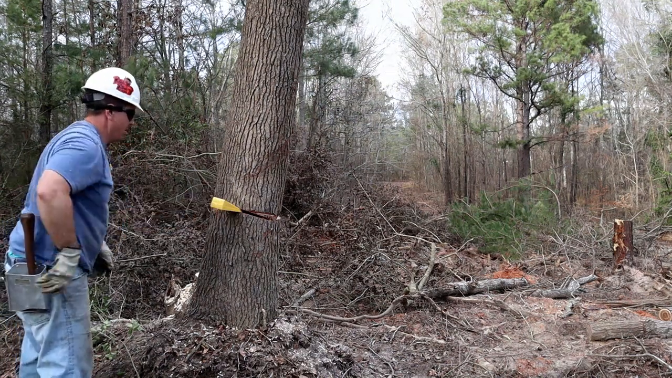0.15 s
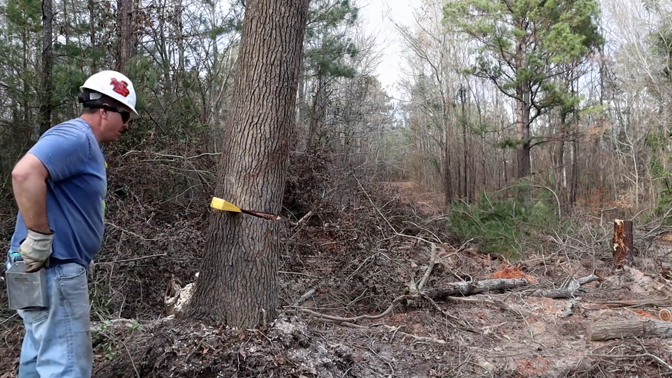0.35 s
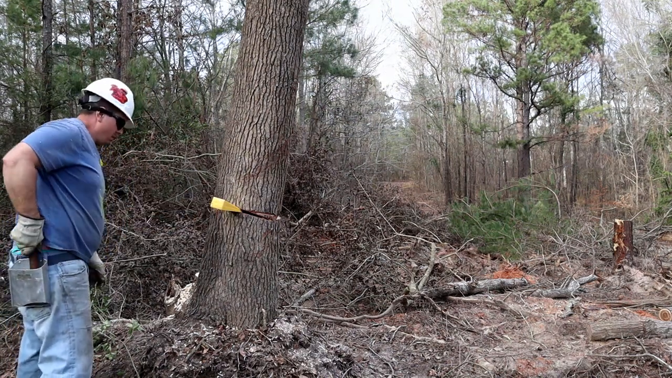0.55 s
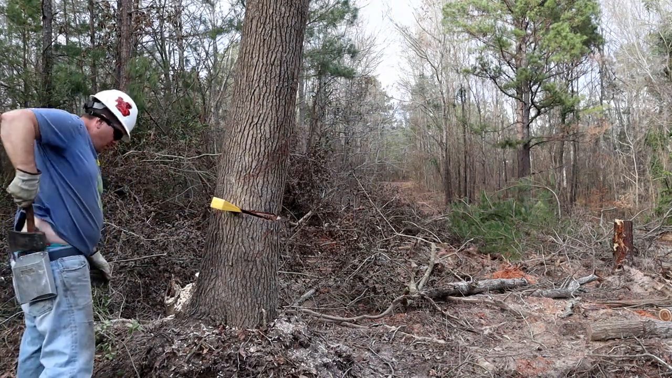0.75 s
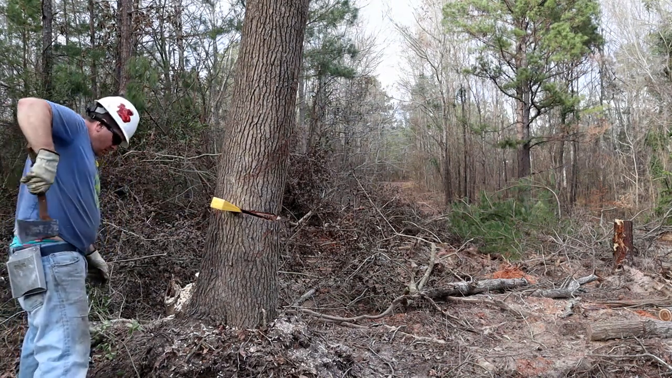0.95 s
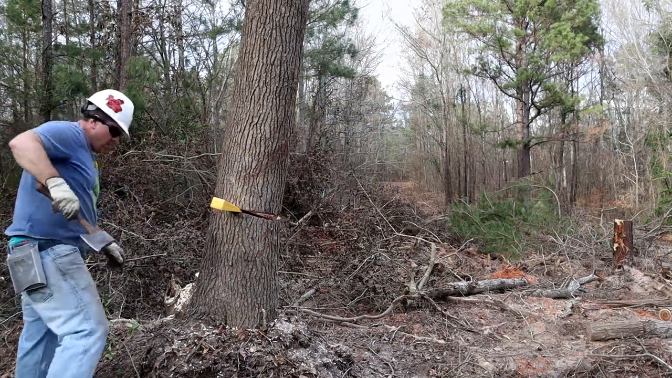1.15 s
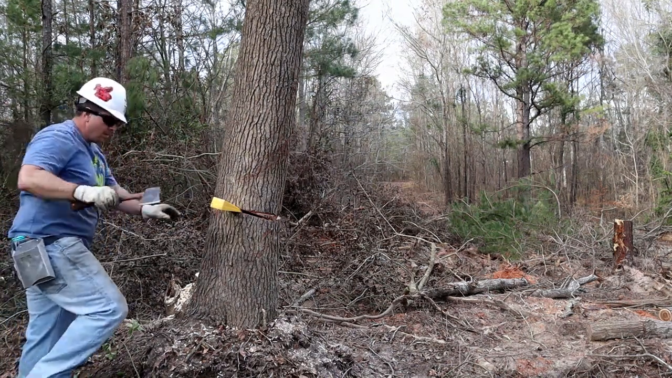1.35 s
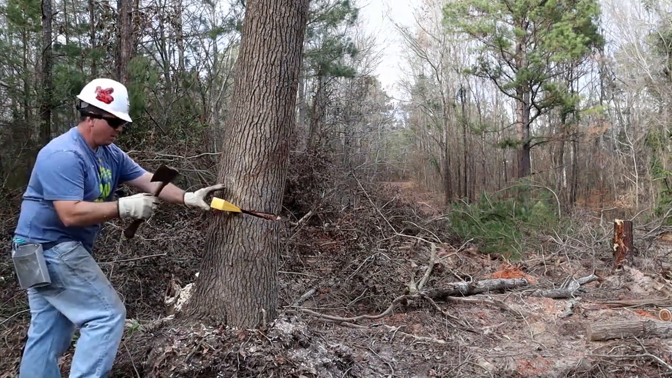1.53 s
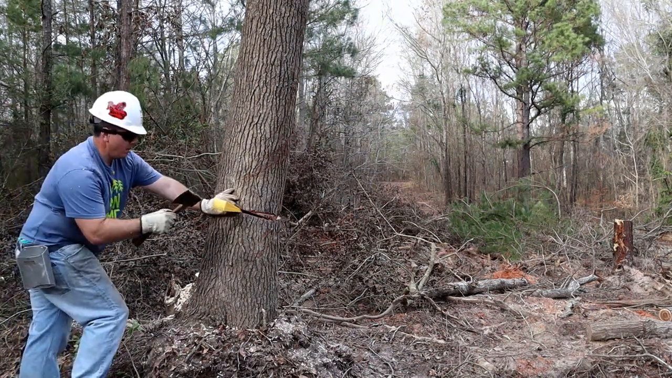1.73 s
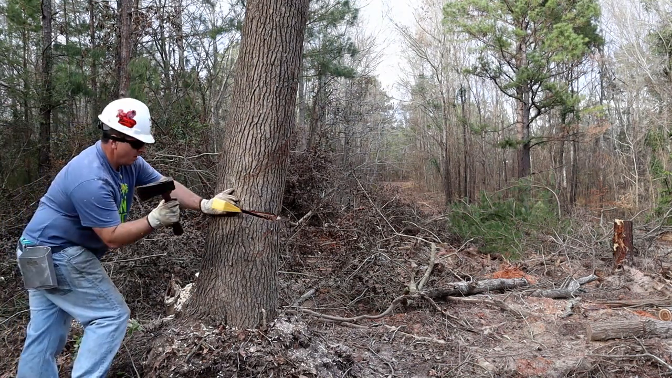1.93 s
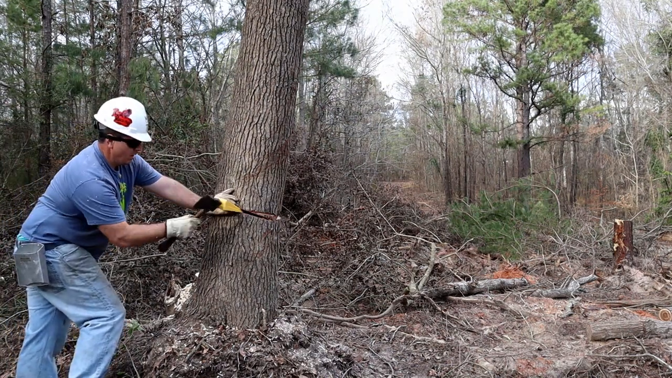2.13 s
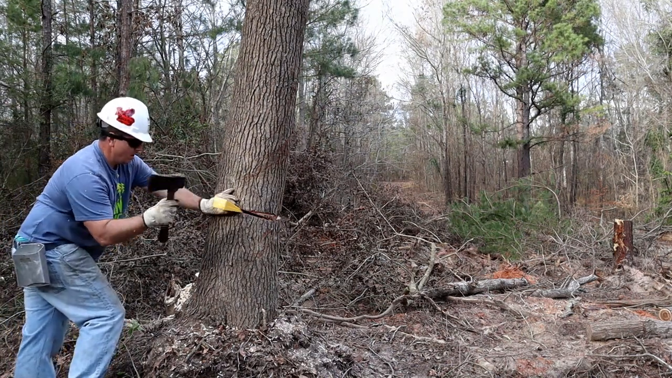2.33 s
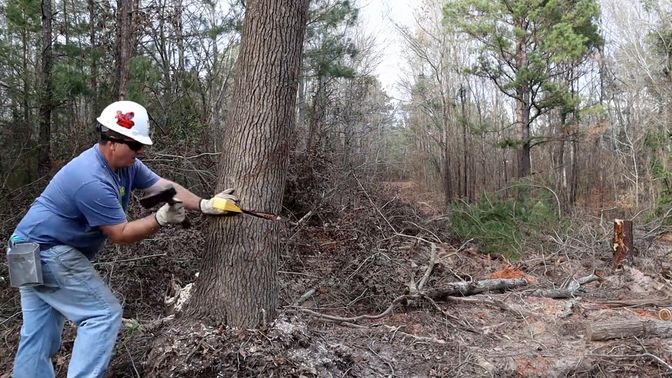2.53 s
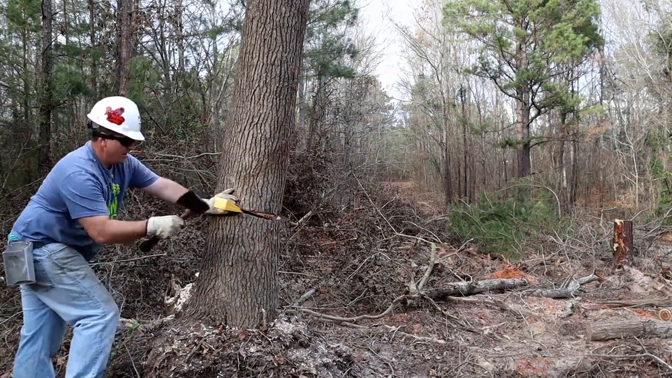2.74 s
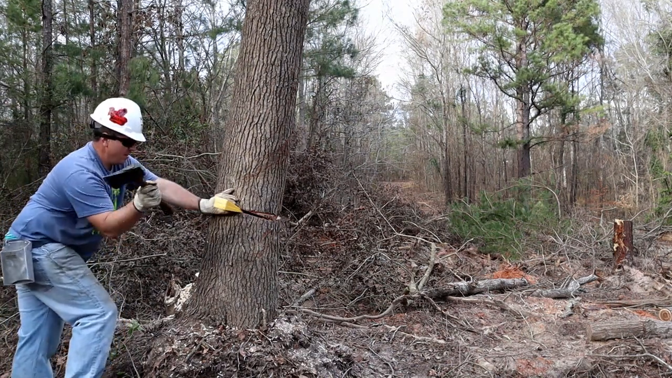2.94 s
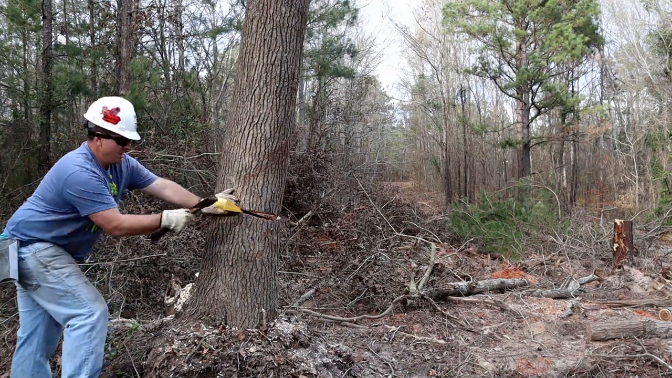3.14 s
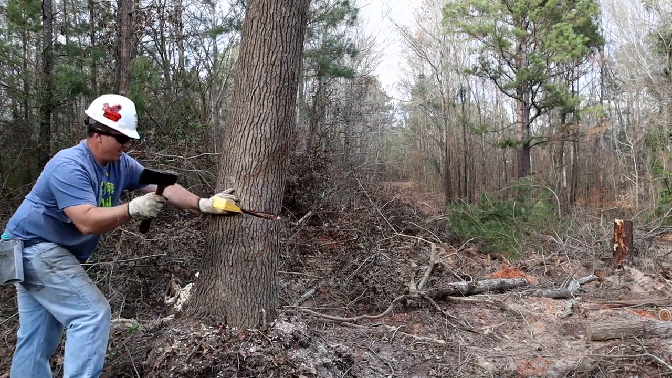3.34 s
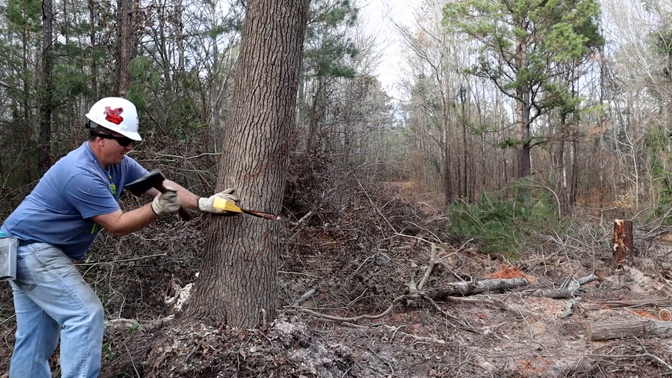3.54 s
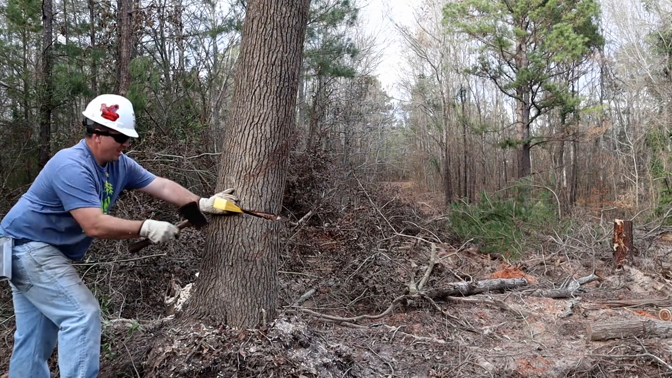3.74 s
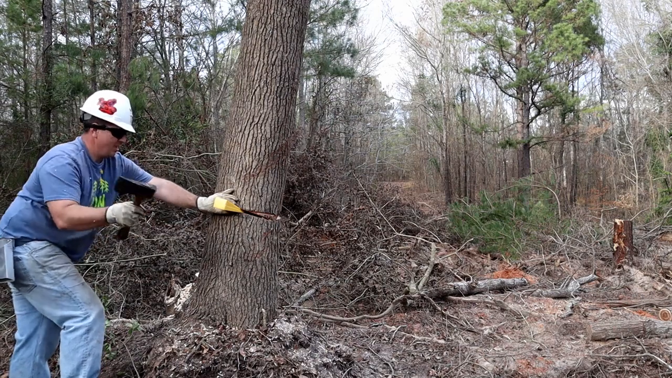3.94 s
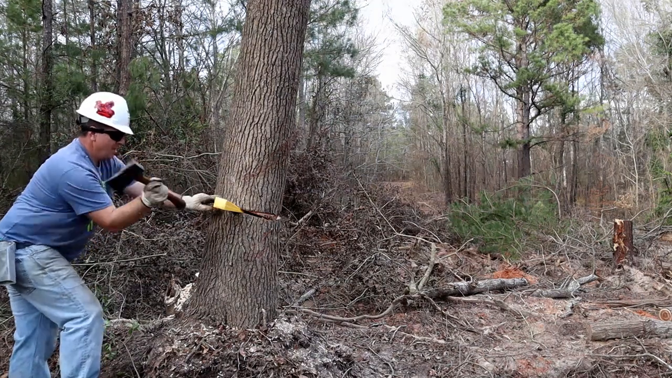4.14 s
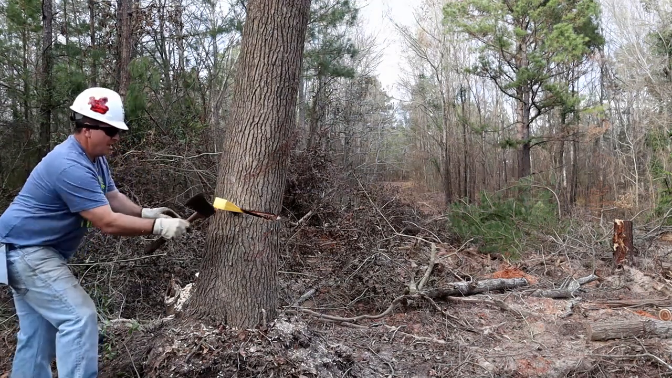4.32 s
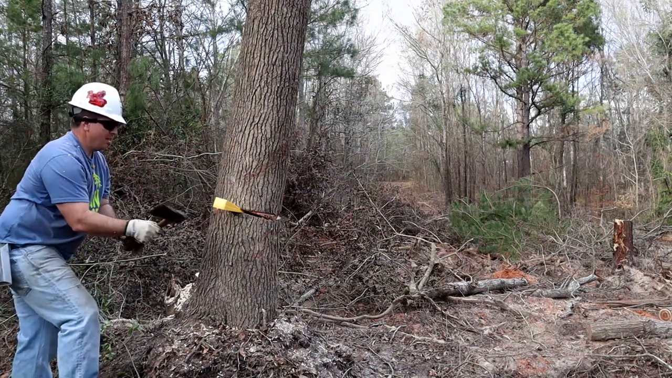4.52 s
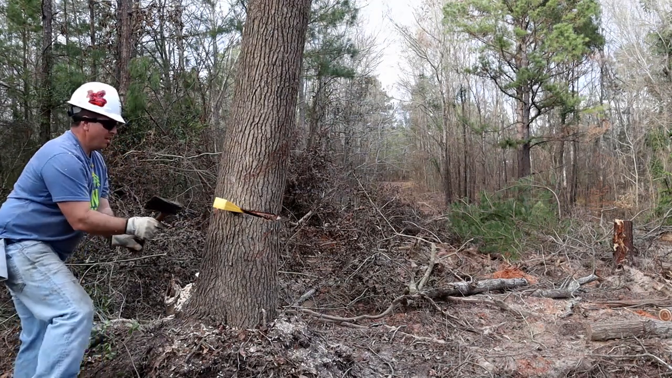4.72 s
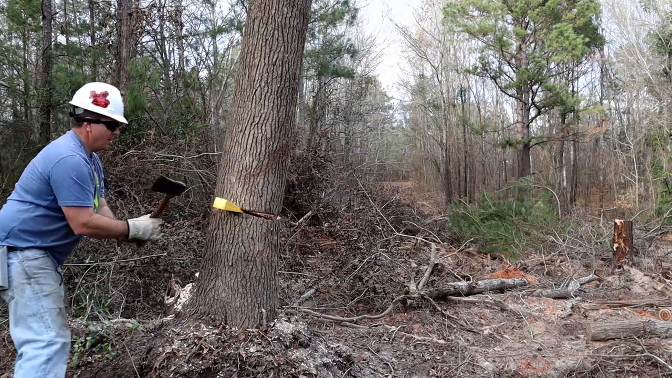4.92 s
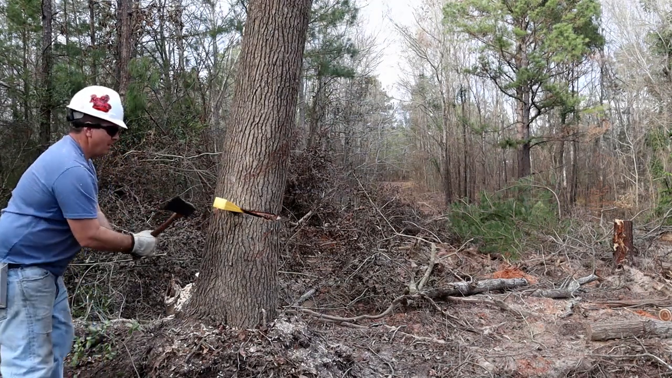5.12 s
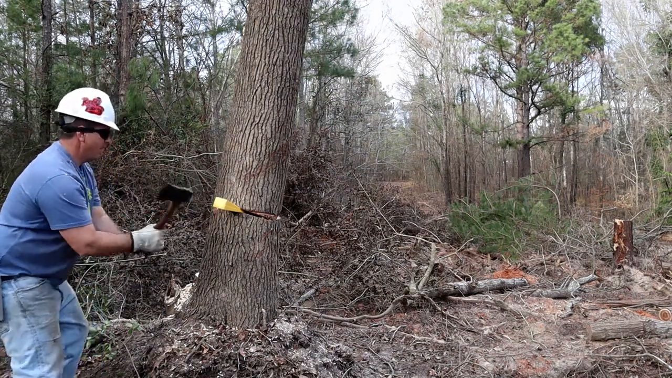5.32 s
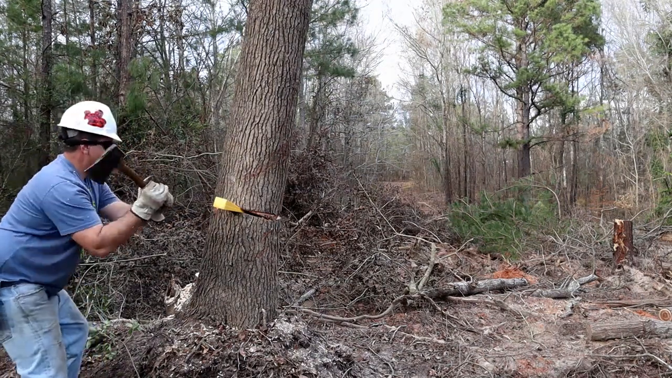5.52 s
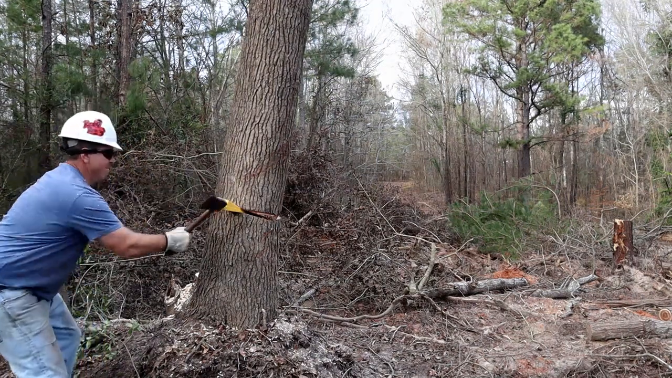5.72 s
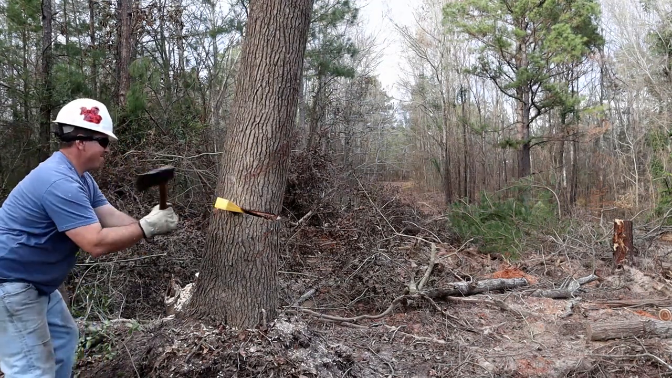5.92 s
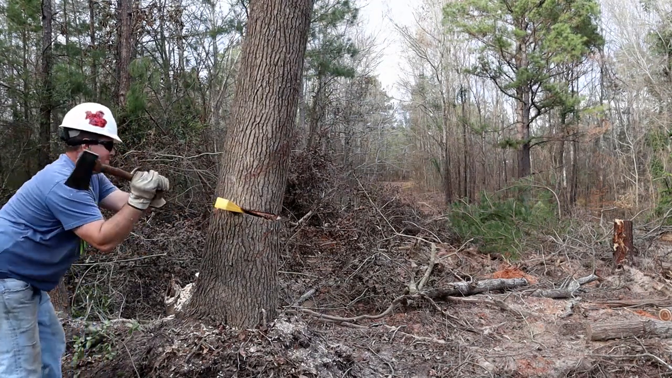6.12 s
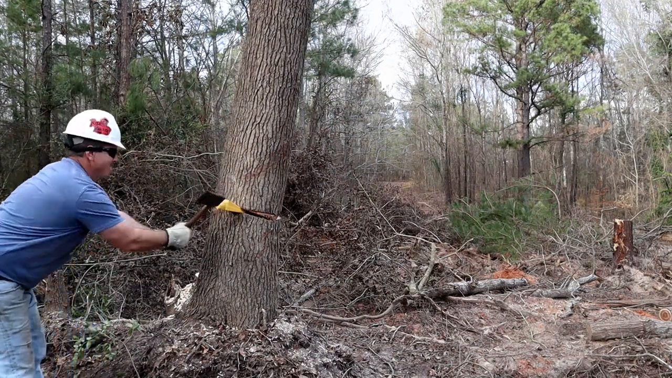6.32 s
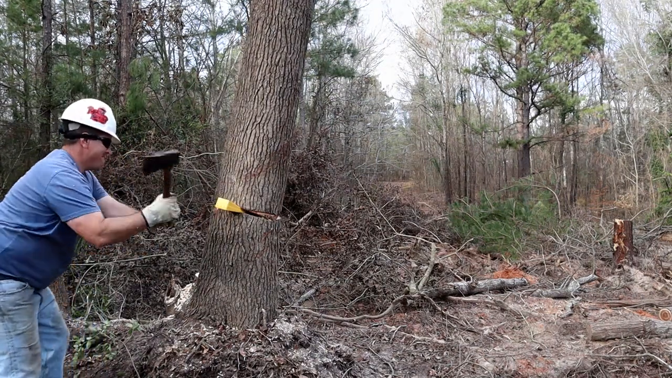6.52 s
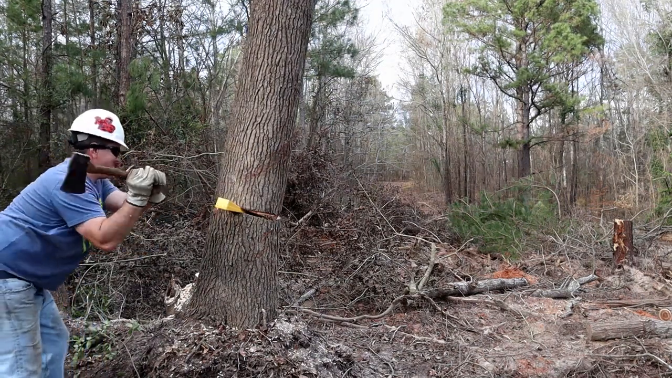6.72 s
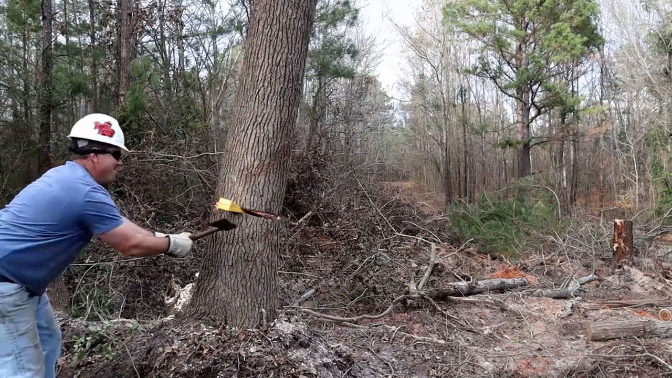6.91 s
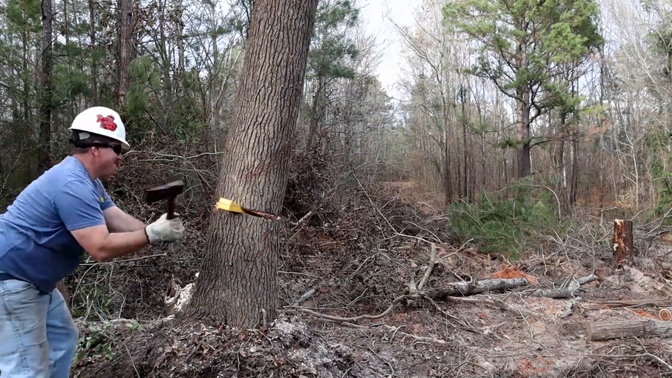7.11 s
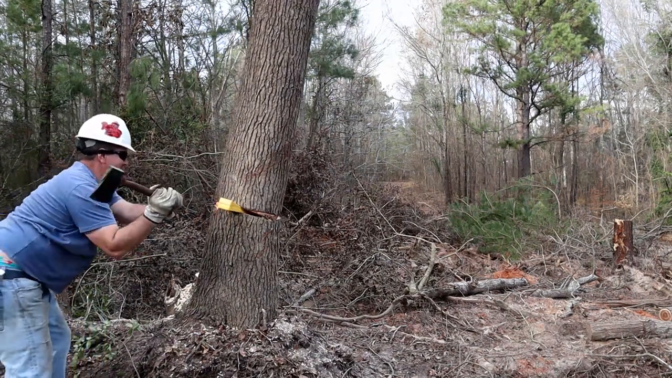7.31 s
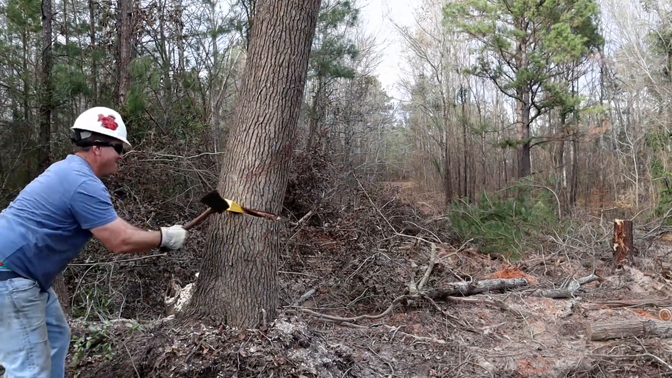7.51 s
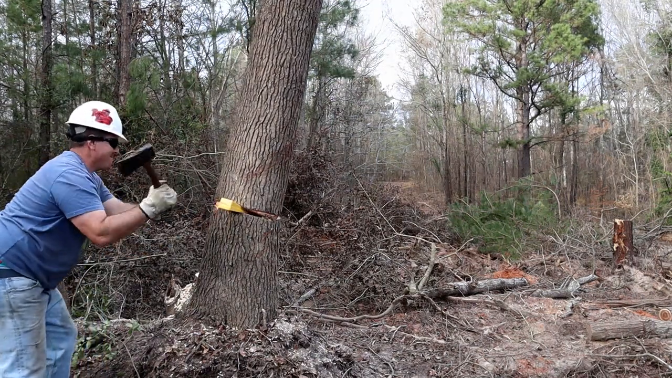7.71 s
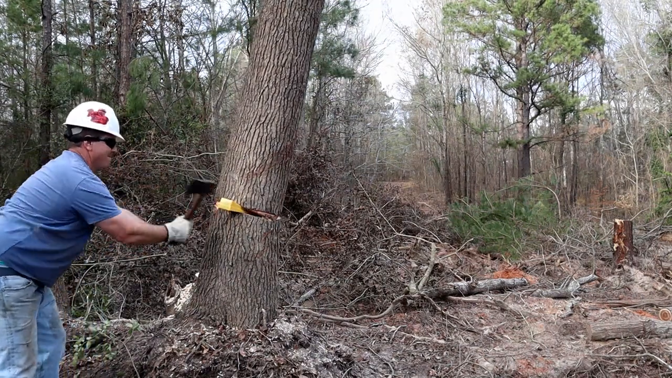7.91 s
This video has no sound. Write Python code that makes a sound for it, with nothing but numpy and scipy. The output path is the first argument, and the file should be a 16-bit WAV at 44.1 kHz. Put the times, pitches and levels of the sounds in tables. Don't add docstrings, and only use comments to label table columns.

```python
import sys
import numpy as np
from scipy import signal
from scipy.io import wavfile
from scipy.ndimage import uniform_filter1d

SR = 44100
rng = np.random.default_rng(int(sys.argv[2]) if len(sys.argv) > 2 else 0)


def generate_wav(signal):
    frames = np.transpose(np.atleast_2d(signal))
    scaled = np.clip(frames, -1, 1) * 32767
    pcm = np.round(scaled).astype(np.int16)
    wavfile.write(sys.argv[1], SR, pcm)


def undo_db(level):
    steps = np.asarray(level, float) / 20
    return 10 ** steps


N = 355357


def evened(x):
    return x / np.sqrt(np.mean(abs(x) ** 2) + 1e-20)


def read(points, hz):
    f, value = np.transpose(points)
    return np.interp(np.log(hz + 1), np.log(f + 1), value)


def add(mix, s, sound):
    part = mix[..., round(s * SR):][..., :sound.shape[-1]]
    part += sound[..., :part.shape[-1]]


def high_pass(x, order, hz):
    return signal.sosfilt(signal.butter(order, hz, "high", fs=SR, output="sos"), x)


# f/Hz, likeness/1
LIKENESS = [(28, .999), (45, .997), (65, .975), (150, 0.93), (550, 0.98), (1650, 0.99), (5000, 0.95),
            (15000, 0.7)]


def noise(size, shape, frame=512):
    hz = np.fft.rfftfreq(frame, 1 / SR)[:, None]
    t = np.arange(size * 4 // frame + 2) * frame / 4 / SR
    a, b, c, d = rng.standard_normal((len(t), len(hz), 4)).T
    same = np.clip(read(LIKENESS, hz), -1, 1)
    magnitude = shape(hz, t) * np.ones(len(t))
    magnitude = magnitude / np.linalg.norm(magnitude, axis=0)
    left = a + 1j * b
    right = same * left + np.sqrt(1 - same ** 2) * (c + 1j * d)
    z = np.array([left, right]) * magnitude
    return evened(signal.istft(z, nperseg=frame, noverlap=frame * 3 // 4)[1][:, :size])


def coloured(x, points):
    log_gain = np.log(undo_db(read(points, abs(np.fft.fftfreq(4096, 1 / SR)))))
    taps = np.fft.ifft(np.exp(log_gain - 1j * signal.hilbert(log_gain).imag)).real[:2048]
    return signal.oaconvolve(x, taps)[:len(x)]


def ringing(x, modes, widen):
    t = np.arange(2048) / SR
    body = np.zeros(len(t))
    for k, (f, width, db) in enumerate(modes):
        fading = np.exp(-np.pi * width * widen * t)
        body += (-1) ** k * undo_db(db) * width * fading * np.sin(2 * np.pi * f * t)
    return signal.oaconvolve(x, body)[:len(x)]


def level(rows):
    s, *columns = np.transpose(rows)
    t = np.arange(s[0], s[-1], 1 / SR)
    return s[0], [np.interp(t, s, c) for c in columns]


# t/s, level/dB
WIND_STRENGTH = [(0, -58), (.6, -59), (.95, -52), (1.2, -48), (1.48, -52), (1.7, -40.5), (2.4, -54),
                 (2.67, -50), (2.96, -60), (3.3, -55), (3.94, -44), (4.45, -47), (4.8, -54), (5.15, -42),
                 (5.32, -40), (5.6, -43), (5.95, -50), (6.3, -44), (6.95, -55), (7.15, -48), (7.45, -52),
                 (7.67, -43), (8.05, -52)]
# f/Hz, level/dB (per Hz)
WIND_TONE = [(8.8, -40), (15, -2.5), (52, 4.5), (116, -4.5), (228, -21.5), (300, -20), (390, -47),
             (660, -120)]
# f/Hz, level/dB (per Hz)
HUM_TONE = [(59, -52), (100, -8), (500, -4.5), (750, -6), (1800, -16), (5880, -19), (12100, -23.5),
            (15500, -27.5)]


def air():
    hum_db, lumps_db, lump_s = -46, 2, .06
    lumps = rng.standard_normal(N)
    for _ in range(2):
        lumps = uniform_filter1d(lumps, round(lump_s * SR))
    wind_db = np.interp(np.arange(N) / SR, *np.transpose(WIND_STRENGTH)) + lumps_db * evened(lumps)
    rumble = noise(N, lambda hz, t: undo_db(read(WIND_TONE, hz) - 32 * (hz > 300)), frame=4096)
    hum = noise(N, lambda hz, t: undo_db(read(HUM_TONE, hz)), frame=1024)
    return undo_db(wind_db - .6) * rumble + undo_db(hum_db - 2.0) * hum


# t/s (of the top), level/dB, rise/s (by 20 dB), fall/s (by 20 dB)
LEAF_RUSTLES = [(1.276, -48, .15, .04), (1.5, -58, .6, .8), (1.606, -39, .07, .04), (1.8, -45.5, .05, .015),
                (1.984, -57.5, .03, .1), (5.098, -43.5, .05, .03), (5.156, -45.5, .12, .3),
                (5.3, -43, .3, .18), (5.38, -40.5, .2, .03), (5.448, -48, .05, .05), (5.6, -46, .4, .1),
                (5.75, -56, .5, .3), (6.08, -47, .2, .5), (6.236, -41.5, .3, .1), (6.376, -45.5, .1, .07),
                (6.74, -52, .2, .3), (6.8, -42, .04, .02), (6.96, -48, .7, .07), (7.24, -49.5, .2, .6),
                (7.392, -46, .05, .015), (7.51, -50, .2, .07), (7.85, -53, .3, .9), (8.03, -52.5, .1, .1),
                (8.055, -42, .01, .05)]
# f/Hz, level/dB (per Hz)
LEAF_TONE = [(290, -4), (500, 6), (716, -2), (983, 3), (6560, 3), (7790, 4), (14300, -6), (15500, -33)]
# t/s, level/dB, f/Hz
TWIG_AND_STALK_SNAPS = [(0.0792, -15.5, 1630), (0.3346, -18, 2200), (0.5886, -18, 2950), (1.1839, -18.5, 2820),
                        (1.2772, -19, 7700), (1.4583, -20, 2290), (1.573, -12, 8170), (1.602, -12, 8250),
                        (1.784, -19, 1740), (1.793, -16.5, 1690), (2.6005, -21, 6500), (3.6192, -13.5, 3150),
                        (5.0662, -20, 1930), (5.0957, -20, 7380), (5.182, -18, 5060), (5.2618, -8, 5800),
                        (5.2824, -8, 4380), (5.3344, -11, 8790), (5.3825, -10, 5300), (5.4084, -17, 4640),
                        (5.4454, -8.5, 7970), (5.5117, -20, 2590), (5.5746, -23, 3170), (5.6334, -11, 1590),
                        (6.1584, -22, 2020), (6.2312, -6, 4430), (6.7974, -21, 6000), (6.8924, -22, 6000),
                        (7.2429, -22, 6500), (7.3886, -18, 6000),
                        (2.712, -27, 6000), (5.0675, -22, 5000), (5.184, -20, 8500), (1.2064, -28, 5690),
               (1.9871, -27, 5610), (3.683, -27, 5060), (5.15, -26, 8250), (5.166, -26, 5810),
               (5.4987, -25, 4890), (5.133, -20, 8500), (5.207, -24, 9000), (5.2665, -14, 4500),
               (5.298, -22, 8000), (5.322, -19, 8200), (5.329, -19, 4000), (5.342, -21, 5000),
               (5.357, -22, 3000), (5.371, -21, 9000), (5.388, -19, 2000), (5.402, -24, 7000),
               (5.524, -24, 8500), (5.537, -25, 6000), (5.581, -23, 7500), (5.596, -25, 6500),
               (5.609, -25, 8500), (5.646, -24, 3000), (5.692, -25, 8000), (7.365, -25, 8500),
               (7.377, -25, 8000), (6.0876, -22, 6500), (6.1284, -27, 7000), (6.3704, -24, 2840),
               (6.9194, -26, 5700), (7.2619, -23, 6000), (7.445, -27, 8400), (7.51, -26, 7500),
               (7.95, -27, 6000)]
# t/s, level/dB
FOOTFALLS = [(1.562, -33), (1.589, -28), (1.79, -35), (5.085, -32.5)]


def leaves():
    out, t = np.zeros((2, N)), np.arange(700) / SR
    now = np.arange(0, N + 32, 32) / SR
    power = np.zeros(len(now))
    for s, db, rise, fall in LEAF_RUSTLES:
        power += undo_db(db - 20 * np.maximum((s - now) / rise, (now - s) / fall)) ** 2
    tread = np.interp(np.arange(N) / SR, now, np.sqrt(power))
    hiss = noise(N, lambda hz, t: undo_db(read(LEAF_TONE, hz)))
    cracks = undo_db(5.4 * np.minimum(rng.exponential(1, N), 3.5)) * (rng.random(N) < .02)
    grain = uniform_filter1d(cracks, 40)
    out += undo_db(5.0) * tread * evened(hiss * (1.2 + evened(grain)))
    for s, db, hz in TWIG_AND_STALK_SNAPS:
        snap = np.sin(2 * np.pi * hz * t) * (1 - np.exp(-t / 0.00019)) * undo_db(-60 * t / 0.0031)
        snap += .22 * rng.standard_normal(len(t)) * undo_db(-60 * t / 0.012)
        add(out, s, undo_db(db - 5.5) * snap[None])
    for s, db in FOOTFALLS:
        soil = noise(2600, lambda hz, t: 1 / (1 + (hz / 500) ** 2), frame=256)
        add(out, s, undo_db(db - 7) * soil * undo_db(-60 * np.arange(2600) / SR / 0.27))
    return out


# t/s, level/dB, f/Hz (hollow tone), rasp/dB (relative), swell/s
POUCH_KNOCKS = [(0.336, -32, 900, -2, .005), (0.401, -32.5, 830, -24, .005),
                (0.467, -14.5, 910, -16, .0065), (0.479, -15, 850, -7, .002),
                (0.5005, -12.5, 930, -10, .006), (0.517, -32, 1000, -14, .005), (.528, -36, 950, -20, .005),
                (0.573, -41, 1050, -5, .005), (0.629, -38, 850, -2, .005), (0.654, -41, 845, 4, .005),
                (0.688, -19, 950, -9, .003), (0.703, -8, 876, -8.5, .003), (0.711, -13, 1100, -20, .002),
                (.7155, -11, 1100, -20, .0025), (0.7255, -15, 1074, -6, .003),
                (0.735, -14, 1020, -14, .002), (0.747, -21, 912, -18, .006),
                (0.758, -20.5, 914, -7.5, .006), (0.7766, -14, 985, -12, .0065),
                (.788, -17, 950, -20, .005), (0.8, -15, 1014, -16, .005), (.8085, -18, 950, -6, .004),
                (0.824, -11.5, 877, -14, .004), (0.833, -15, 880, -6, .005), (.842, -16, 900, -12, .004),
                (0.849, -12.5, 950, -10, .004), (.858, -19, 1000, -16, .003),
                (0.867, -20.5, 1020, -3, .003), (0.878, -22, 950, -10, .005)]
# t/s, level/dB (low body, relative), f/Hz (squeak)
HANDLE_SLIDE = [
    (.47, -12, 2700),
    (.7, -8, 2200),
    (.88, -28, 3600),
]
# t/s, level/dB, f/Hz
RIM_CLACKS = [(.4665, -25, 1500), (.501, -20, 1150), (.688, -24, 1450), (.7015, 0, 1250), (.716, -14, 1500),
              (.726, -15, 1500), (.7355, -13, 1350)]
# t/s, length/s, level/dB, f/Hz
LEATHER_SQUEALS = [(.334, .01, -38, 3500), (.334, .008, -38, 2300), (.466, .006, -30, 2700),
                   (.478, .005, -30, 4300), (.5, .008, -30, 2900), (.5, .007, -33, 4400),
                   (.726, .006, -32, 5700), (.846, .012, -33, 6000), (.752, .018, -36, 2900),
                   (.826, .03, -29, 4350), (.826, .022, -33, 3500), (.832, .012, -32, 2200),
                   (.865, .012, -30, 4550), (.868, .02, -36, 3500)]
# t/s, level/dB, rasp/dB (relative)
HANDLE_DRAGS = [
    [(0.46, -53, -15), (0.468, -18, -13), (0.49, -36, -8), (0.514, -36, -4), (0.55, -47, -10)],
    [(0.61, -55, 9), (0.658, -43, 7), (0.672, -58, 9), (0.704, -17, -1), (0.745, -26, -8), (.772, -26, -4),
     (.815, -22, -2), (0.852, -17.5, -3), (0.92, -50.5, 5)],
]
# f/Hz, width/Hz, level/dB
POUCH_HOLLOWS = [(416, 39, -34), (845, 88, 14), (1280, 25, -1), (2130, 110, -15)]
# f/Hz, level/dB (per Hz)
RASP_TONE = [(880, -22), (1450, 1.5), (1830, -16), (2200, -7), (5000, -12.5), (12000, -14), (15600, -34),
             (22000, -120)]


def pouch():
    out, t = np.zeros(SR), np.arange(1500) / SR
    slide_s, *slide = np.transpose(HANDLE_SLIDE)
    for s, db, hz, rasp_db, swell in POUCH_KNOCKS:
        low_db, squeak_hz = (np.interp(s, slide_s, c) for c in slide)
        swelling = (t / swell) ** 1.8 * np.exp(.6 - .7 * (t / swell) ** 2.6)
        hollow = np.sin(2 * np.pi * hz * t) * swelling
        low = undo_db(low_db) * np.sin(2 * np.pi * 410 * t) * undo_db(-60 * t / 0.02)
        grit = rng.standard_normal(len(t))
        squeaks = [(squeak_hz, 220, 0), (1.62 * squeak_hz, 220, -4)]
        squeak = evened(coloured(grit, RASP_TONE)) + 0.6 * evened(ringing(grit, squeaks, 1))
        tick = undo_db(rasp_db - 5) * squeak * undo_db(-60 * t / 0.035)
        add(out, s, undo_db(db + 2.5) * (hollow + low + tick))
    for s, db, hz in RIM_CLACKS:
        add(out, s, -undo_db(db) * np.sin(2 * np.pi * hz * t) * undo_db(-60 * t / .011))
    for s, length, db, hz in LEATHER_SQUEALS:
        rub = evened(ringing(rng.standard_normal(len(t)), [(hz, 260, 0)], 1))[:round(length * SR)]
        add(out, s, undo_db(db) * rub * signal.windows.tukey(len(rub), .6))
    for rows in HANDLE_DRAGS:
        s, (db, rasp_db) = level(rows)
        slips = rng.standard_normal(len(db)) * undo_db(1.2 * rng.exponential(1, len(db)))
        slips = slips * (rng.random(len(db)) < .2)
        drag = evened(ringing(slips, POUCH_HOLLOWS, 0.38))
        drag = drag + undo_db(rasp_db) * evened(coloured(slips, RASP_TONE))
        add(out, s, undo_db(db - 6) * drag * signal.windows.tukey(len(db), .08))
    nearby = rng.standard_normal(6000) * undo_db(-60 * np.arange(6000) / SR / .16)
    out = out + undo_db(-19) * signal.oaconvolve(out, nearby / np.linalg.norm(nearby))[:SR]
    return high_pass(out, 4, 230)


# f/Hz, level/dB (per Hz)
CRACK_TONE = [(35, -39), (60, -11.5), (559, -2.5), (2780, -1), (3350, -7), (8300, -6.5), (13000, -12),
              (15500, -30)]


def veil(lead):
    size = round((lead + 0.037) * SR)
    hiss = noise(4096, lambda hz, t: undo_db(.55 * read(CRACK_TONE, hz)), frame=256)[:, :size]
    near = np.exp(-abs(np.arange(size) / SR - lead) / 0.0055)
    return undo_db(-30) * hiss * signal.windows.tukey(size, .3) * (1 + 1.3 * near)


# f/Hz, width/Hz, level/dB
TRUNK_TONES = [(130, 50, -3.5), (192, 21, -3), (335, 76, -2)]


def blow(db, thud_db, knock_db, ground_db, modes, contact, spring, sizzle_db, sizzle_t60):
    click_hz, spring_s, sizzle_hz = 5000, .0009, 3500
    t = np.arange(9000) / SR
    sides = [[1], [-1]]
    click = 1. * (t == 0)
    soft_click = 2 * np.pi * click_hz / SR * np.exp(-2 * np.pi * click_hz * t)
    raw = rng.standard_normal((2, len(t)))
    grit, bounce = raw * (undo_db(-60 * t / 0.018) + undo_db(-17.5 - 60 * t / 0.18))

    late = np.maximum(t - .0059, 0)
    grit = grit + undo_db(ground_db - 60 * late / 0.037) * (late > 0) * rng.standard_normal(len(t))
    thrown = undo_db(ground_db + 1.5) * np.diff(np.roll(click, round(.0055 * SR)), prepend=0)

    tones = list(modes) + [(410, 80, knock_db + 4)]
    ring = ringing(undo_db(-29) * grit + soft_click - thrown, tones, 1.15)
    bare = high_pass(coloured(grit, CRACK_TONE), 2, 600)
    crack = evened(bare) + undo_db(3.5) * evened(ring)
    bright = bounce + 0.71 * np.diff(bounce, prepend=0)
    crack = crack + undo_db(-11.5) * evened(coloured(bright, CRACK_TONE)) * sides
    crack = undo_db(db + 23) * evened(crack) / np.sqrt(len(t)) * undo_db(-60 * t / 0.1)
    crack = np.roll(crack, round(contact * SR), axis=1)

    push = -.95 * np.sin(np.pi * np.minimum(t / contact, 1))
    springing = np.exp(-(t - contact) / spring_s) * (t > contact)
    push = push + spring * .6 * contact / spring_s * springing

    hiss = raw[0, ::-1] + .25 * raw[1, ::-1] * sides
    band = signal.butter(2, [sizzle_hz, 11000], "band", fs=SR, output="sos")
    sizzle = evened(signal.sosfilt(band, hiss))
    sizzle = undo_db(sizzle_db - 60 * t / sizzle_t60) * np.clip(t / .0055, 0, 1) * sizzle

    boom = evened(ringing(rng.standard_normal(len(t)), TRUNK_TONES, 1.3)) * .95
    boom = boom + .9 * np.sin(2 * np.pi * 200 * t) * undo_db(25 * t)
    thud = undo_db(thud_db) * boom * (1 - np.exp(-t / 0.024)) * undo_db(-60 * t / 0.31)
    return crack + push + sizzle + thud


# f/Hz, level/dB (per Hz)
WOODS_TONE = [(120, -5), (200, -4.5), (268, -18.5), (586, -7), (716, -8), (1650, -3.5), (5120, -6),
              (9860, -8)]
# f/Hz, change/(dB/s)
AIR_LOSS = [(300, -16.5), (1000, 22.5), (3700, -17), (6000, -47), (12000, -86)]


def echo(top_s, top_db, modes, steel_hz, steel_db, lasting_db):
    dip_db, step_db, fall_db_per_s = -37, -5, 42
    blur_hz, blur_share = 110, .035
    steel_width_hz = 120
    t = np.arange(32000) / SR
    past_db = top_db + step_db
    end_db = past_db - fall_db_per_s * (1 - top_s)
    db = np.interp(t, [.02, .038, top_s, top_s + 0.015, 1], [-60, dip_db, top_db, past_db, end_db])

    def hump(hz, f, width):
        return 1 / (1 + (2 * (hz - f) / width) ** 2) ** 2

    def shape(hz, t):
        plain_db = read(WOODS_TONE, np.minimum(hz, 9000)) - 3.7 * np.maximum(hz - 9000, 0) / 1000
        power = undo_db(-5.5 + plain_db) ** 2
        for f, _, ring_db in modes:
            ring_gain = undo_db(ring_db - 1.6 * max(f - 4000, 0) / 1000)
            power = power + ring_gain ** 2 * hump(hz, f, blur_hz + blur_share * f)
        steel = undo_db(steel_db + lasting_db * t) ** 2 * hump(hz, steel_hz, steel_width_hz)
        return np.sqrt(power + steel) * undo_db(read(AIR_LOSS, hz) * t)

    return undo_db(db) * noise(len(t), shape, frame=1024)


# t/s, level/dB, thud/dB (trunk), knock/dB (low), lead/s (of the veil)
HATCHET_BLOWS = [(2.2429, 1, -34, -6, .033), (2.747, 1, -32.5, -10, .028), (3.246, 0, -27.5, -3, .03),
                 (3.7535, 1.5, -22.5, 0, .03), (4.3725, 1.5, -28.5, -4, .033), (5.849, 1, -30.5, -15, .037),
                 (6.4294, 0, -35, -25, .018), (7.005, .5, -24.5, -15, .02), (7.5523, 1, -32, -30, .032)]
# bounce/dB (off the ground), t/s (swell's top, after the blow), level/dB (top)
BLOW_ECHOES = [(-11, .105, -29.5), (-6.5, .11, -26), (-6, .108, -26), (-8, .11, -27), (-6, .125, -25),
               (-15, .128, -24), (-6, .138, -22), (-8, .11, -24), (-11, .13, -23)]
# f/Hz, level/dB (ring), level/dB (returned by the woods)
BLOW_RINGS = [
    [(1040, 5, -8), (1440, 3, -11), (2310, 14, -4), (2800, 10, -5), (4030, 11, -7), (4630, 7, -10),
     (5560, 5, -9)],
    [(925, 13, -8), (2070, 7, -8), (2800, 10, -6), (4740, 8, -9), (4050, 6, -12), (7130, 8, 0),
     (8140, 7, -9)],
    [(900, -4, -8), (1950, 9, -5), (2240, 10, -9), (2670, 13, -7), (4350, 7, -12), (4930, 8, -10),
     (6600, 5, -8)],
    [(1530, 4, -7), (1850, 2, -8), (2450, 9, -7), (3660, 10, -12), (4500, 5, -12), (5600, 6, -6),
     (6220, 7, -9)],
    [(950, -16, -3.5), (1090, 11, -9), (1300, 9, -8), (2400, 9, -3), (3230, 8, -12), (5730, 12, 0),
     (8000, 7, -1)],
    [(550, 6, -5), (1000, 8, -2), (1340, 6, -6), (2500, 10, -8), (3050, 9, -4), (4600, 6, -12),
     (5550, 9, -3), (6070, 6, -9)],
    [(930, 4, -14), (1295, 15, -3), (1640, 3, -4), (2480, 10, -12), (2950, 5, -4), (3700, 17, 1),
     (5200, 6, -2)],
    [(580, 3, -5), (1100, 7, -8), (1390, 11, -1), (2540, 14, -1), (4100, 3, -3), (5340, 0, -10),
     (6220, 1, -10)],
    [(585, 3, -4), (1545, 18, -4), (2000, 0, -4), (2500, 8, -9), (2880, 9, -9), (3400, 8, -9),
     (4200, 8, -6), (5210, 6, -4)],
]
# f/Hz, level/dB, lasting/(dB/s)
STEEL_TONES = [(2220, -5, 0), (930, -5, 0), (2650, -7, 0), (2410, -7, 0), (5610, -1, 22), (575, -5, 8),
               (3715, 0, 14), (1460, -3, 0), (5230, -6, 15)]
# contact/s, spring/1 (share of shove springing back), sizzle/dB, fade/s (60 dB of sizzle)
STEEL_LANDINGS = [(.0004, .6, -16, .07), (.00035, 1.6, -14, .07), (.00035, 1.6, -15, .06),
                  (.0004, .4, -17, .07), (.0005, .2, -11, .08), (.0003, 1.3, -15, .1),
                  (.00025, .9, -23, .1), (.0004, .8, -26, .07), (.0004, .7, -9, .045)]


def hammering(mix):
    after = np.arange(SR // 2) / SR
    rows = zip(HATCHET_BLOWS, BLOW_ECHOES, BLOW_RINGS, STEEL_TONES, STEEL_LANDINGS)
    for (s, db, thud_db, knock_db, lead), (ground_db, *swell), modes, steel, landing in rows:
        mix[:, round(s * SR):][:, :len(after)] *= undo_db(-18 * np.exp(-(after / 0.086) ** 2))
        rings = [(f, 60 + .03 * f, ring_db) for f, ring_db, _ in modes]
        add(mix, s - lead, veil(lead))
        add(mix, s - .0002, blow(db, thud_db, knock_db, ground_db, rings, *landing))
        add(mix, s, echo(*swell, modes, *steel))


def scene():
    mix = air() + leaves()
    drawn = pouch()
    add(mix, 0, np.array([1.03 * drawn + 0.25 * np.roll(drawn, 9), drawn]))
    hammering(mix)
    return mix


def thinned(x):
    hz, t, z = signal.stft(x, SR, "cosine", nperseg=2048, noverlap=1024)
    body = np.sqrt((abs(z[:, 15:400]) ** 2).mean(1, keepdims=True))
    patches = uniform_filter1d(rng.standard_normal((len(t), len(hz))), size=24, axis=1)
    ragged_db = 5.3 * evened(patches).T
    floor_db = np.interp(hz, [6000, 8600, 10400, 13000, 15200], [-63, -23, -9.5, -16, -10])
    floor = body * undo_db(floor_db[:, None] + ragged_db)
    keep = np.clip(4 * (abs(z) / (floor + 1e-12) - 1), 0, 1) * (hz < 15700)[:, None]
    return signal.istft(z * keep, SR, "cosine", nperseg=2048, noverlap=1024)[1][:, :N]


def top_cut(x):
    return signal.sosfilt(signal.butter(12, 15690, fs=SR, output="sos"), x)


def record(dry):
    clipped = np.clip(dry * undo_db([[-.2], [.2]]), -.98, .98)
    mix = thinned(clipped)
    return top_cut(mix)


dry = scene()
out = record(dry)
generate_wav(out)
```